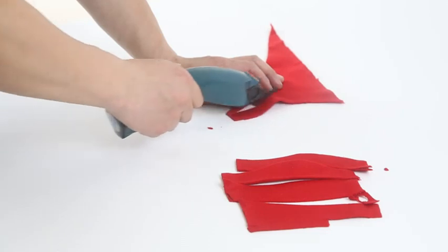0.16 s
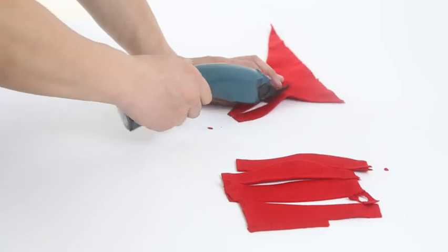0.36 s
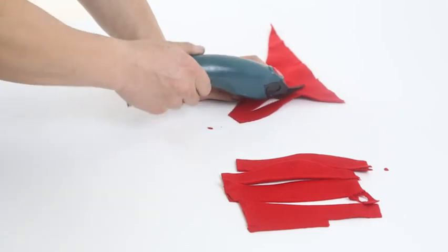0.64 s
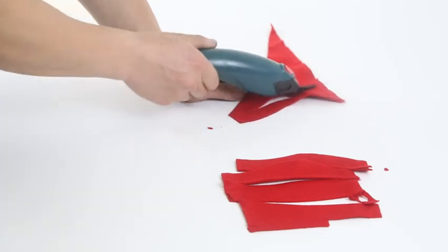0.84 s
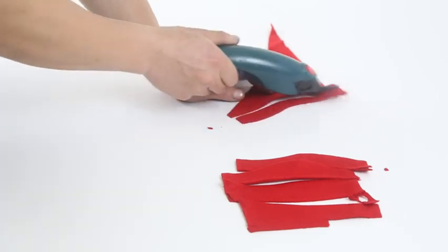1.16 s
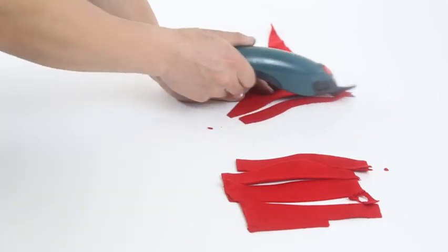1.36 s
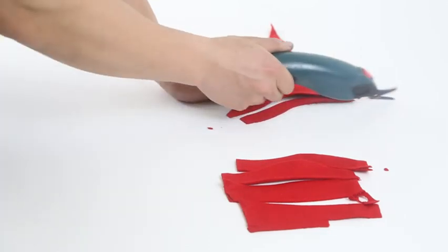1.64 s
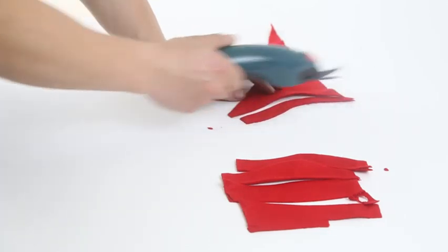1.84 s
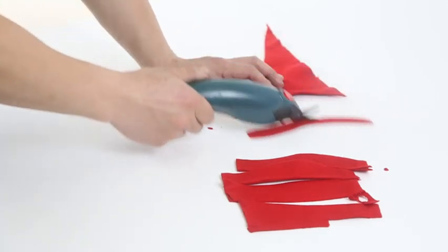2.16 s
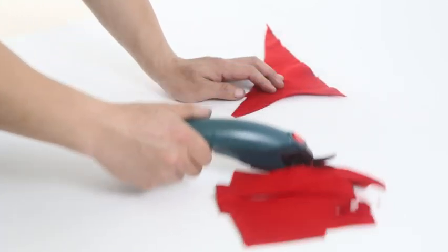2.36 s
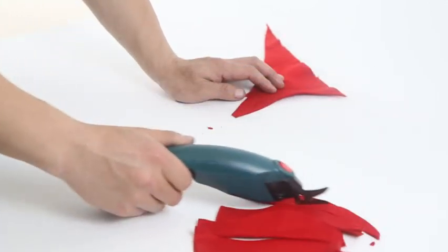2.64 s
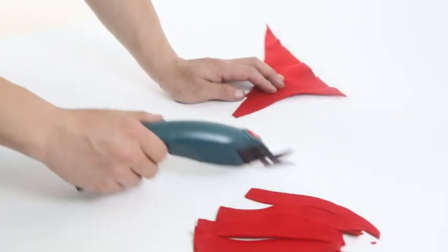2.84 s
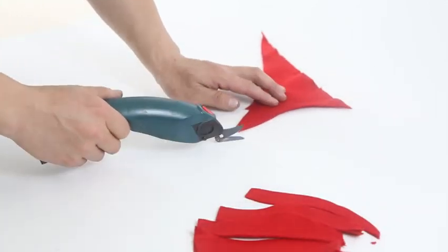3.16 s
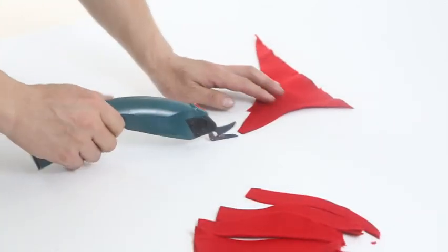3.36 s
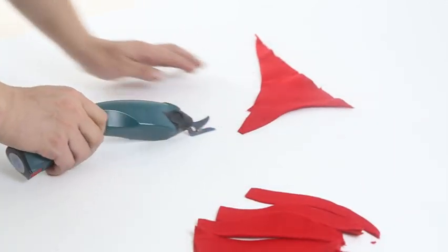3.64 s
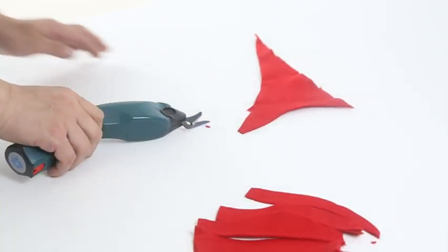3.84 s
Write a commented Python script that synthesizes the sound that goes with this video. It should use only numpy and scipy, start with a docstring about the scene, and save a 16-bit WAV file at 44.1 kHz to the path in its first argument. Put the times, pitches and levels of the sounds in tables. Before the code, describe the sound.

In a bare, ringing room, electric scissors buzz and rattle through fabric, making the table hum. The motor winds down about halfway through, leaving light handling clicks, soft rustling and a thump as the tool is put down.

```python
"""First comes the fast clatter of cordless electric scissors cutting cloth on a table in a bare, ringing room.
The blade clacks at each turn of its stroke, the gears rasp, and the table hums under the tool's shoe.
Lifted off, the tool runs free, is switched off and coasts down. Then cloth rustles, the grip clicks
and the tool is set down with a thump, over room noise and a thin electrical whine."""
import sys
import numpy as np
from scipy import signal
from scipy.fft import rfft, irfft
from scipy.io import wavfile
from scipy.ndimage import uniform_filter1d

SR = 44100
rng = np.random.default_rng(int(sys.argv[2]) if len(sys.argv) > 2 else 0)


def generate_wav(sig):
    """Save sig (samples, or channels by samples) to the path in sys.argv[1] as 16-bit PCM at SR."""
    pcm = np.round(np.clip(np.atleast_2d(sig).T, -1, 1) * 32767).astype(np.int16)
    wavfile.write(sys.argv[1], SR, pcm)


N = 176400
LEAD_S = 1  # a head start, so the room is already ringing at time 0
T = np.arange(-LEAD_S * SR, N) / SR
M = len(T)

CUT_HZ, FREE_HZ, SPEED_WOBBLE = 59.95, 60.75, .0008  # strokes a second, and how much they waver
TILT_S, TILT_LENGTH_S = .51, .16  # the hand tilts the tool and pushes on
LIFT_S, LIFT_LENGTH_S = 1.56, .22  # the blade leaves the cloth
OFF_S, COAST_S, FRICTION_HZ = 1.93, .52, 26
CLACK_SCATTER_DB, BOUNCE_S, BOUNCE_DB = 1, .0008, -1.5
CASE_T60_S, BLADE_T60_S, TICK_T60_S, THUD_T60_S = .011, .008, .028, .22  # T60: time to fade by 60 dB
CASE_DB, CHATTER_DB, GEAR_DB, KNOCK_DB = -7.5, -2, -10.5, -21
BLADE_DB, SCRAPE_DB, RUB_DB = -1.5, -4, -9.5
CHATTER_S, SCRAPE_S, THUMP_ATTACK_S = .0008, .0015, .0017
SHELL_HZ, SHELL_WIDTH_HZ, SHELL_DB = 2365, 340, -14  # where the gear housing rings most
CASE_COAST_DB, BLADE_COAST_DB = 22, 37  # level lost when the motor is ten times slower
HUM_WANDER_DB, BUZZ_WANDER_DB, THUD_DB = .68, 2.86, -4
AIR_DB, WHINE_HZ, WHINE_DB, TOP_HZ = -39, 15684, -51.5, 15850

# Hits in one stroke: (place when cutting [0-1], place when free [0-1], strength when cutting [dB],
# strength when free [dB], timing scatter [s])
CONTACTS = [(.05, 0.01, 2, 3, .00014), (.665, .565, -0.5, 0, .00018), (.33, .33, -3.5, -28, .0007)]
# How loud the running tool is: (time [s], casing level [dB], blade level [dB])
TOOL_LEVELS = [(0, -21, -29.5), (.23, -21, -29), (.38, -21, -30), (.51, -25, -31.5), (.6, -20, -30),
               (.77, -23, -31.5), (.86, -21, -29), (1.3, -22.5, -29.5), (1.45, -20.3, -29),
               (1.53, -22.5, -30.5), (1.75, -22.5, -28.5), (1.9, -22, -27)]
# Tone of the casing at the start of the cut, along it and running free: (frequency [Hz], gain [dB])
CASE_START = [(500, -22), (740, -19), (850, -7.5), (1050, -6.5), (1300, -4.5), (1500, -5), (1950, -6.5),
              (2250, -0.5), (2500, -1), (2850, -2.5), (3400, -2.5), (4100, -5.5), (5000, -25)]
CASE_CUT = [(500, -20.5), (750, -12.5), (860, -9), (1100, -8.5), (1400, -4), (1650, -7.5), (1950, -6),
            (2250, -2), (2550, 0.5), (2850, -2.5), (3300, -4), (4100, -4), (5000, -23.5)]
CASE_FREE = [(500, -19), (680, -10), (850, -6.5), (1100, -0.5), (1280, -5.5), (1500, -4.5), (1900, -5.5),
             (2200, 0.5), (2520, -0.5), (2800, -2), (3400, -2), (4200, -4), (5000, -22)]
# Dull knock of the casing: (frequency [Hz], gain [dB])
KNOCK_TONE = [(180, 0), (450, 0)]
# Tone of the steel blade in the same three stages: (frequency [Hz], gain [dB])
BLADE_START = [(2650, -35), (4500, -2), (6600, -5), (7450, 2.5), (8200, -5), (9200, -1), (12300, -12.5),
               (15000, -18)]
BLADE_CUT = [(2650, -27), (4500, -4.5), (5480, -10), (6180, -6.5), (7010, -7), (7520, -6), (8360, -8.5),
             (9580, -5), (10400, -7.5), (11300, -13), (15000, -23.5)]
BLADE_FREE = [(2650, -18), (4500, 1), (5450, -3), (6730, 0), (7990, -2.5), (9020, 0.5), (10900, -5),
              (15000, -17)]
# How hard the shoe shakes the table: (time [s], hum level [dB], buzz level [dB])
SHOE_LEVELS = [(0, -30, -24.5), (.3, -29.5, -22.5), (.5, -33, -25.5), (.65, -32, -26.5), (1.0, -33, -24.5),
               (1.42, -39, -24), (1.6, -43, -27), (1.72, -74, -33), (1.93, -65, -60), (2.15, -85, -46)]
# Table hum at 1 to 5 times the stroke rate: (relative level [dB])
HUM_DB = [-28, 3.5, -4, -25, -17.5]
# Tones in the buzz: (frequency [times the stroke rate])
BUZZ_MULTIPLES = [7, 8, 9, 10, 12, 14, 15, 16, 17, 19, 20, 21, 22, 23, 24, 25, 26, 27, 28, 29, 30, 31, 37,
                  39, 40, 42, 49]
# Those tones at the start of the cut and after it: (relative level [dB])
BUZZ_START_DB = [-23, -29, -13, -37, -11.5, -8, -7, -8, -1, -6.5, 1, -11, 2.5, -14, 0, -15, -2, -4.5, -12,
                 -21, -20, -2, 2, -0.5, -10.5, 3, -30]
BUZZ_CUT_DB = [-15.5, -19, -8, -16, -9.5, 0, -2, -9, -5.5, -0.5, -28, -1.5, -10, 3.5, 3, -25, -1, 3, -7,
               -23, -1.5, -10, -5, -7.5, -2, -3, -1.5]
# The tool lands on the table: (time [s], strength [dB])
THUMPS = [(3.715, -31.5), (3.724, -30.5), (3.789, -39)]
# Notes of the struck table: (frequency [Hz], relative level [dB], T60 [s])
TABLE_NOTES = [(126, -4, .15), (146, 3, 0.2), (220, 3, 0.058), (294, 3.5, 0.098), (347, 1, 0.17),
               (426, -6, .1), (553, -6, 0.077), (624, -7, .1)]
# Dull noise in each thump: (frequency [Hz], gain [dB])
THUD_TONE = [(110, -3), (300, -2), (600, -11), (800, -17)]
# Clicks of the handled tool: (time [s], level [dB], centre [Hz], reach to each side [octaves])
TICKS = [(2.351, -32, 2500, 0.48), (2.72, -38, 2300, 0.52), (2.838, -46, 2300, 0.54),
         (3.442, -38, 2500, 0.56), (3.464, -42, 2480, .6), (3.603, -37, 2500, .6), (3.625, -31, 2220, 0.5),
         (3.943, -41, 3900, 0.22), (3.945, -38, 8500, 0.62)]
# A hand slides on cloth: (peak time [s], time to swell or fade [s], level [dB])
RUSTLES = [(3.13, .1, -54), (3.642, 0.16, -47.5), (3.898, 0.11, -53)]
# Tone of the rustle: (frequency [Hz], gain [dB])
CLOTH_TONE = [(200, 8), (700, -1), (1500, -13), (2700, -1), (5000, -12), (7500, -14.5), (9700, -11.5),
              (14000, -32)]
# How long the room rings: (frequency [Hz], T60 [s])
ROOM_T60 = [(100, 0.6), (500, 1.38), (1400, 1.93), (2400, 1.54), (3700, 1.16), (5000, 1.27), (9700, 0.8),
            (16000, 0.25)]
# Tone of the room noise: (frequency [Hz], gain [dB])
AIR_TONE = [(25, -19), (48, -8), (62, -14), (90, -3), (140, -4), (180, -7), (280, -6), (400, -9.5),
            (540, -8), (900, -11), (1300, -15.5), (2500, -18.5), (5270, -32.5), (14500, -45)]


def scissors(load, stroke_hz, strokes):
    """The same clacks shake the casing and the blade; both grow quieter as the motor slows."""
    hits, speed = clacks(load, strokes), stroke_hz / FREE_HZ
    case = casing(hits, load, speed) * speed ** (CASE_COAST_DB / 20)
    steel = blade(hits, load, speed) * speed ** (BLADE_COAST_DB / 20)
    case = follow(room(case, wet_db=.5), TOOL_LEVELS, column=1)
    steel = follow(room(steel, wet_db=-2), TOOL_LEVELS, column=2)
    return case + steel


def motor():
    """The motor speeds up a little out of the cloth; once it is off, friction brakes it."""
    load = np.clip(.5 - (T - LIFT_S) / LIFT_LENGTH_S, 0, 1)  # 1 cutting, 0 free
    driven_hz = (FREE_HZ + (CUT_HZ - FREE_HZ) * load) * (1 + SPEED_WOBBLE * wander(12))
    coast = np.exp(-np.maximum(T - OFF_S, 0) / COAST_S)
    stroke_hz = np.maximum((driven_hz + FRICTION_HZ) * coast - FRICTION_HZ, 0)
    strokes = np.cumsum(stroke_hz) / SR
    return load, stroke_hz, strokes - strokes[LEAD_S * SR]


def clacks(load, strokes):
    """The blade hits at both ends of its stroke and bites the cloth between; each hit bounces once."""
    hits = np.zeros(M)
    for cut, free, cut_db, free_db, scatter in CONTACTS:
        hit_count = np.floor(strokes - free - (cut - free) * load)
        at = np.flatnonzero(np.diff(hit_count) > 0)
        late, strong, rebound = rng.standard_normal(size=(400, 3))[:len(at)].T
        force = undb(free_db + (cut_db - free_db) * load[at] + CLACK_SCATTER_DB * strong)
        first = at + SR * scatter * late
        bounce = first + SR * BOUNCE_S * np.exp(.5 * rebound)
        np.add.at(hits, np.clip(first, 0, M - 1).astype(int), force)
        np.add.at(hits, np.clip(bounce, 0, M - 1).astype(int), force * undb(BOUNCE_DB))
    return hits


def casing(hits, load, speed):
    """Each clack rings the casing and sets loose parts chattering, while the gears rasp."""
    after_hit = signal.lfilter([1], [1, -np.exp(-1 / (CHATTER_S * SR))], hits)
    ringing = undb(CASE_DB) * unit_running(ring(hits, CASE_T60_S))
    chatter = undb(CHATTER_DB) * unit_running(after_hit * noise())
    gears = undb(GEAR_DB) * noise() * np.sqrt(speed)
    shake = ringing + chatter + gears
    knock = undb(KNOCK_DB) * unit_running(colour(shake, KNOCK_TONE))
    case = held_tone(shake, load, (CASE_START, CASE_CUT, CASE_FREE)) + knock
    shell = signal.iirpeak(SHELL_HZ, SHELL_HZ / SHELL_WIDTH_HZ, fs=SR)
    return case + undb(SHELL_DB) * signal.lfilter(*shell, case)


def blade(hits, load, speed):
    """The steel rings, its edges scrape around each clack, and it rubs as long as it moves."""
    swell = np.exp(-2 * abs(np.arange(-SR // 100, SR // 100)) / (SCRAPE_S * SR))
    around_hit = signal.fftconvolve(hits, swell, "same")
    ringing = undb(BLADE_DB) * unit_running(ring(hits, BLADE_T60_S))
    scrape = undb(SCRAPE_DB) * unit_running(around_hit * noise())
    rub = undb(RUB_DB) * noise() * np.sqrt(speed)
    return held_tone(ringing + scrape + rub, load, (BLADE_START, BLADE_CUT, BLADE_FREE))


def ring(hits, t60):
    """Each hit wakes a crowd of notes that die quickly."""
    t = np.arange(SR // 10) / SR
    response = rfft(noise(len(t)) * fade(t, t60))
    response /= np.sqrt(uniform_filter1d(abs(response) ** 2, size=50))  # even out bass and treble
    return signal.fftconvolve(hits, irfft(response))[:M]


def stages(load):
    """Shares of the three ways the tool is held: starting the cut, along the cut, free."""
    along = np.clip(.5 + (T - TILT_S) / TILT_LENGTH_S, 0, 1)
    return load * (1 - along), load * along, 1 - load


def held_tone(x, load, tones):
    """The tone changes with the way the tool is held."""
    return sum(share * unit_running(colour(x, tone)) for share, tone in zip(stages(load), tones))


def table_buzz(load, strokes):
    """The shoe shakes the table at multiples of the stroke rate; the tones waver as it slides."""
    def tone(multiple, db):
        return undb(db) * np.sin(2 * np.pi * (multiple * strokes + rng.random()))

    start = stages(load)[0]
    hum = sum(tone(k, db + HUM_WANDER_DB * wander(2.8)) for k, db in enumerate(HUM_DB, 1))
    buzz = sum(tone(k, start * start_db + (1 - start) * cut_db + BUZZ_WANDER_DB * wander(3.925))
               for k, start_db, cut_db in zip(BUZZ_MULTIPLES, BUZZ_START_DB, BUZZ_CUT_DB))
    return follow(hum, SHOE_LEVELS, column=1) + follow(buzz, SHOE_LEVELS, column=2)


def thumps():
    """The tool lands, and the table answers with low notes and a dull thud."""
    out = np.zeros(M)
    rumble = unit(colour(noise(), THUD_TONE))
    for when, db in THUMPS:
        t = T[T >= when] - when
        notes = sum(undb(note_db) * np.sin(2 * np.pi * (hz * t + rng.random())) * fade(t, t60)
                    for hz, note_db, t60 in TABLE_NOTES)
        thud = undb(THUD_DB) * rumble[:len(t)] * fade(t, THUD_T60_S)
        attack = 1 - np.exp(-t / THUMP_ATTACK_S)
        out[T >= when] += undb(db) * attack * (notes + thud)
    return out


def grip_clicks():
    """The tool clicks in the hand: tiny bursts of noise that fade fast."""
    out = np.zeros(M)
    t = np.arange(SR // 20) / SR
    for when, db, hz, octaves in TICKS:
        edges_hz = [hz / 2 ** octaves, min(hz * 2 ** octaves, TOP_HZ)]
        band = signal.butter(2, edges_hz, "band", fs=SR, output="sos")
        click = undb(db) * unit(signal.sosfilt(band, noise(len(t)))) * fade(t, TICK_T60_S)
        at = np.searchsorted(T, when)
        out[at:at + len(t)] += click[:M - at]
    return out


def cloth_rustle():
    """A hand slides on cloth, making soft, slightly uneven swells of noise."""
    slide = sum(undb(db) * np.exp(-((T - when) / width) ** 2) for when, width, db in RUSTLES)
    return slide * undb(wander(90)) * unit(colour(noise(), CLOTH_TONE))


def room(x, wet_db):
    """The bare walls add a wash of echoes at wet_db; the highest treble dies first."""
    t = np.arange(SR * 3 // 2) / SR
    band_hz, band_t60 = np.array(ROOM_T60).T
    spectrum, hz = rfft(noise(len(t))), np.fft.rfftfreq(len(t), 1 / SR) + 1
    tail = np.zeros(len(t))
    for pick, t60 in zip(np.eye(len(band_hz)), band_t60):
        band = np.interp(np.log(hz), np.log(band_hz), pick)
        tail += irfft(spectrum * band) * fade(t - .004, t60)  # echoes start 4 ms late
    return x + undb(wet_db) * signal.fftconvolve(x, tail / np.linalg.norm(tail))[:M]


def background():
    """Steady room noise and a thin electrical whine."""
    air = undb(AIR_DB) * unit(colour(noise(), AIR_TONE))
    whine = undb(WHINE_DB) * unit(np.sin(2 * np.pi * WHINE_HZ * T))
    return air + whine


def noise(samples=M):
    """Plain white hiss."""
    return rng.standard_normal(samples)


def undb(db):
    """Turn decibels into a gain."""
    return np.exp(np.asarray(db) * (np.log(10) / 20))


def unit(x):
    """Scale to an average power of 1."""
    return x / np.sqrt(np.mean(x ** 2))


def unit_running(x):
    """Scale to an average power of 1 while the motor is on."""
    return x / np.sqrt(np.mean(x[T < OFF_S] ** 2))


def follow(x, levels, column):
    """Make the loudness of x follow one column of a table over time."""
    rows = np.array(levels)
    return unit_running(x) * undb(np.interp(T, rows[:, 0], rows[:, column]))


def wander(rate_hz):
    """A smooth random drift, about 1 in size."""
    step = int(SR / rate_hz)
    return 1.2 * uniform_filter1d(np.repeat(noise(M // step + 1), step), step)[:M]


def colour(x, points, skirt_db=24):
    """Shape the tone by a table; beyond its ends, drop skirt_db an octave for two octaves."""
    size = 8192
    octave = np.log2(np.maximum(np.fft.rfftfreq(size, 1 / SR), 1))
    hz, db = np.array(points).T
    outside = abs(octave - np.clip(octave, np.log2(hz[0]), np.log2(hz[-1])))
    gain = undb(np.interp(octave, np.log2(hz), db) - skirt_db * np.minimum(outside, 2))
    # these steps make the filter ring only after a hit, never before it
    cepstrum = irfft(np.log(gain))
    cepstrum[1:size // 2] *= 2
    cepstrum[size // 2 + 1:] = 0
    return signal.oaconvolve(x, irfft(np.exp(rfft(cepstrum))))[:M]


def fade(t, t60):
    """Start at t = 0 and die away by 60 dB every t60 seconds."""
    return (t >= 0) * np.exp(-np.log(1000) * np.maximum(t, 0) / t60)


def scene():
    """Add up all the sounds; the tool is already running when the scene opens."""
    load, stroke_hz, strokes = motor()
    tool = scissors(load, stroke_hz, strokes) + table_buzz(load, strokes)
    handling = room(thumps() + grip_clicks() + cloth_rustle(), wet_db=-3)
    return (tool + handling + background())[None, -N:]


def record(dry):
    """Cut away the treble above TOP_HZ."""
    return signal.sosfilt(signal.ellip(10, .1, 90, TOP_HZ, fs=SR, output="sos"), dry)


dry = scene()
out = record(dry)
generate_wav(out)
```